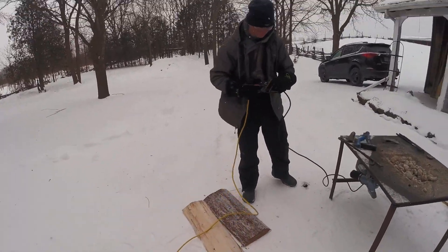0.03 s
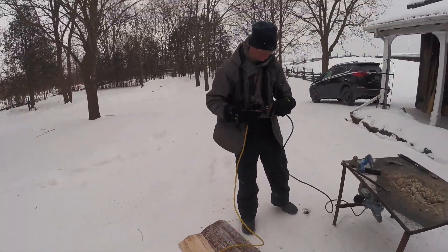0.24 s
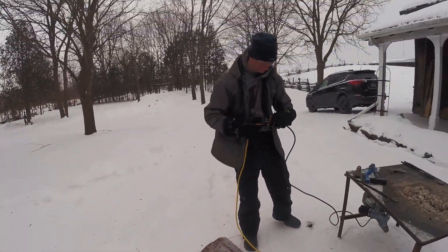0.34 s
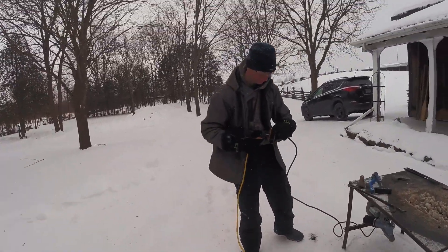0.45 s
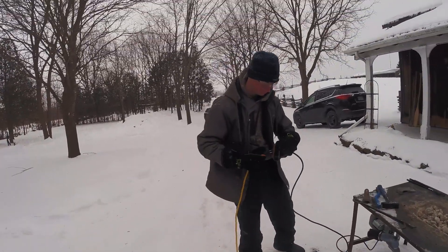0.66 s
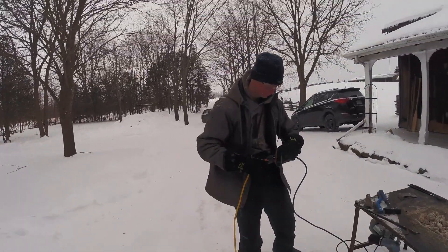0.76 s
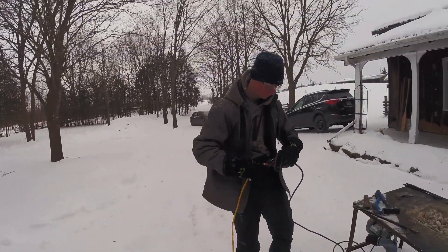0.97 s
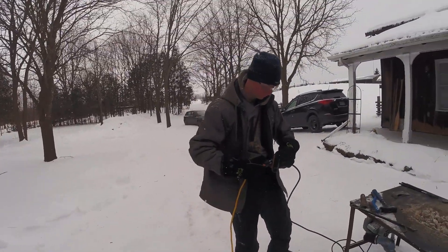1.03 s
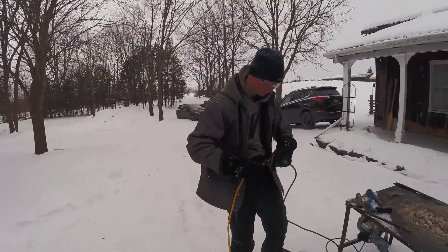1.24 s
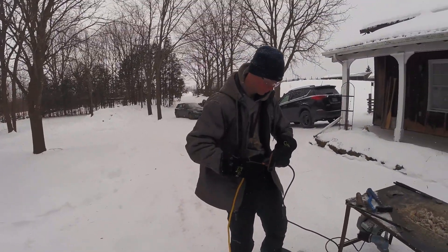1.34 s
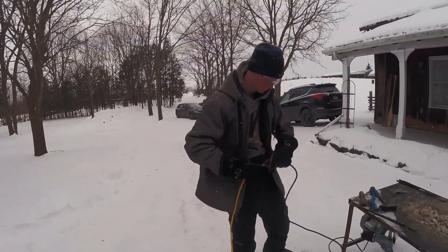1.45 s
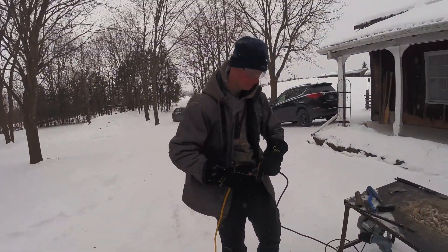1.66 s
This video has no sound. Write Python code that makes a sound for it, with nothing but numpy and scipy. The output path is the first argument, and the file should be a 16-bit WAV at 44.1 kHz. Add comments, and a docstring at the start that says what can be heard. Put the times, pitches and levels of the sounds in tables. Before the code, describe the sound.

Boots crunch in crusty snow, two slow steps with small snaps and brief squeaks, close to a hand-held microphone in an open yard. Wind rumbles throughout. Faint taps and a brief low ring precede one last short crunch.

```python
"""A faint tap over a quiet outdoor hush, then two slow steps in cold snow, close to a hand-held
microphone in an open yard. Under each boot the crust snaps here and there, then packs down in a
dense crunch of breaking grains, with a brief squeak now and then. Loose crumbs tick between the
steps and wind buffets the microphone. Near the end come more faint taps and a brief low ring
from nearby, and a last short crunch with a thudding snap."""
import sys
import numpy as np
from scipy import signal
from scipy.fft import rfft, irfft, next_fast_len
from scipy.io import wavfile
from scipy.ndimage import uniform_filter1d

SR = 44100
rng = np.random.default_rng(int(sys.argv[2]) if len(sys.argv) > 2 else 0)


def bounce(signal):
    """Save signal as a 16-bit WAV file at the path given by the first command-line argument."""
    frames = np.transpose(np.atleast_2d(signal))
    limited = np.clip(frames, -1, 1)
    pcm = np.round(limited * 32767).astype(np.int16)
    wavfile.write(sys.argv[1], SR, pcm)


N = 74970


def undb(db):
    """Decibels to gain."""
    return 10 ** (np.asarray(db) / 20)


def unit(x):
    """Scale to rms 1."""
    return x / np.sqrt(np.mean(x ** 2) + 1e-20)


def colour(x, points):
    """Causal, minimum-phase filter through (Hz, dB) points."""
    size = 2 * next_fast_len(N)
    hz, db = np.array(points).T
    bin_hz = np.arange(size // 2 + 1) * SR / size
    log_gain = np.log(undb(np.interp(np.log(bin_hz + 1), np.log(hz), db)))
    cepstrum = irfft(log_gain)
    cepstrum[1:size // 2] *= 2
    cepstrum[size // 2 + 1:] = 0
    return irfft(rfft(x, size) * np.exp(rfft(cepstrum)))[:N]


def curve(rows, column):
    """Gain over time from one dB column; silent outside the rows."""
    rows = np.array(rows)
    return undb(np.interp(np.arange(N) / SR, rows[:, 0], rows[:, column], left=-120, right=-120))


def even(x, window_s=.031):
    """Hold the short-term rms near 1 while keeping the fine grain."""
    size = int(window_s * SR)
    power = uniform_filter1d(uniform_filter1d(x ** 2, size), size // 2)
    return x / np.sqrt(power + 1e-20)


def grains(per_s, spread_db):
    """Random fractures, many small and a few large."""
    chance, size, sign = rng.random(N), rng.exponential(size=N), rng.choice([-1, 1], N)
    return (chance < per_s / SR) * sign * undb(spread_db * np.minimum(size, 5))


def cracks(rows, bands, count=2048, softness_hz=1500, level_window_s=.008):
    """Each crack is a sharp break and a short crumbling, softened and levelled in three bands."""
    out, t = np.zeros(N + count), np.arange(count) / SR
    filters = [signal.butter(3, band, "bp", fs=SR, output="sos") for band in bands]
    for start, decay, *levels in rows:
        burst = .45 * rng.standard_normal(count) * np.exp(-t / decay)  # the crumbling
        burst[0] += 1  # the break
        burst = signal.lfilter(*signal.butter(1, softness_hz, fs=SR), burst)
        i = int(start * SR)
        for k, (sos, db) in enumerate(zip(filters, levels)):
            part = signal.sosfilt(sos, burst)
            gain = undb(db) * np.sqrt(level_window_s * SR / np.sum(part ** 2))
            out[i:i + count] += (-1) ** k * gain * part
    return out[:N]


def hush():
    """The steady, mostly low background of the open yard."""
    # Each row: frequency in Hz, relative level in dB.
    hush_colour = [(20, -3.5), (100, -2), (300, -7), (600, -18), (1200, -26.5), (2500, -24.5),
                   (5000, -30.5), (10000, -39), (15500, -46)]
    return undb(-54.5) * unit(colour(rng.standard_normal(N), hush_colour))


def crumbs():
    """Loose crumbs of snow tick softly around the steps."""
    # Tone of the ticks. Each row: frequency in Hz, relative level in dB.
    crumb_colour = [(100, -25), (350, -2), (600, 0), (1200, -6), (2500, -15), (5000, -24), (10000, -38),
                    (15000, -52)]
    # Their rise and fall. Each row: time in seconds, relative level in dB.
    crumb_levels = [(0, 4.5), (.2, 5), (.7, 2), (.8, -4.5), (1.2, -1), (1.5, 1), (1.7, -6)]
    ticks = unit(colour(grains(per_s=330, spread_db=2), crumb_colour))
    return undb(-61.5) * ticks * curve(crumb_levels, column=1)


def taps(treble_octaves=1.15):
    """Small hard taps nearby, each with its own bright resonance."""
    # Each row: start and decay in seconds, low, mid and treble levels in dB, treble centre in Hz.
    strikes = [(0.015, 0.0021, -54.5, -61, -62, 4940), (.127, 0.0017, -50, -53.5, -55, 6560),
               (1.233, 0.0015, -68, -69, -62.5, 10000), (1.438, 0.0026, -51, -54, -62.5, 8500),
               (1.4584, 0.0016, -51, -49, -45, 3140), (1.604, 0.0016, -59, -67, -64, 11000)]
    # The low and mid bands. Each row: lower and upper edge in Hz.
    bands = [(350, 1000), (950, 3600)]
    edge_ratios = 2 ** (np.array([-1, 1]) * treble_octaves / 2)
    return sum(cracks([row], bands + [hz * edge_ratios]) for *row, hz in strikes)


def yard(x, t, t60_s=.12):
    """The close sound plus a faint short scatter from the snowy yard."""
    tail = rng.standard_normal(N) * np.exp(-np.log(1000) * t / t60_s)
    return x + undb(-19) * signal.fftconvolve(x, tail / np.sqrt(np.sum(tail ** 2)))[:N]


def snaps():
    """The crust snaps under the boot, close to the microphone."""
    # Each row: start and crumble time in seconds, relative low, mid and treble levels in dB.
    breaks = [(.056, 0.00033, -45, -52, -61), (.071, 0.001, -54.5, -75, -77),
              (.0945, 0.00085, -53, -62, -74), (.144, 0.0025, -35.5, -57, -63),
              (.154, 0.004, -41, -55, -52.5), (.22, 0.00093, -37.5, -43, -67),
              (.2725, 0.0017, -34, -45, -55), (.297, 0.00065, -53, -65, -72),
              (.3225, 0.0009, -49, -50.5, -60), (.333, 0.00053, -39.5, -49, -73),
              (.336, 0.0011, -40.5, -59, -68), (.368, 0.0017, -40.5, -45, -66),
              (.3935, 0.0022, -41, -49, -54.5), (.425, 0.00065, -42, -43, -58),
              (.4395, 0.0011, -41, -47, -53), (.4585, 0.00084, -50, -43, -56),
              (.476, .001, -43.5, -47.5, -58), (.4995, 0.00073, -48, -43, -54),
              (.5265, 0.00064, -45, -44, -52), (.547, .003, -35, -45, -48), (.5735, 0.0019, -44, -47, -54),
              (.6095, 0.0019, -32.5, -46.5, -54.5), (.615, .0015, -36, -53, -62),
              (.6495, 0.00097, -39.5, -52.5, -62), (.8595, 0.001, -40.5, -56.5, -64),
              (.9335, 0.0034, -38.5, -46, -53), (.945, 0.0012, -40.5, -48, -57),
              (.9945, 0.00093, -45.5, -56, -66), (1.016, 0.0027, -36, -47, -49.5),
              (1.0225, 0.0028, -36, -56, -60), (1.0305, 0.0021, -43.5, -47, -57),
              (1.041, .0008, -43, -56, -73), (1.057, .0015, -38, -46, -53), (1.0705, 0.0005, -49, -49, -54),
              (1.0855, 0.0037, -36, -43.5, -53.5), (1.104, 0.0054, -36, -47, -65),
              (1.111, 0.0023, -37.5, -44, -56), (1.129, .001, -43, -56, -63),
              (1.1465, 0.0016, -39.5, -52, -61), (1.157, 0.00091, -50, -57, -59),
              (1.2065, 0.0014, -39.5, -48.5, -62.5), (1.283, .002, -51, -60, -65),
              (1.393, 0.0015, -53, -59.5, -77), (1.678, 0.0022, -38, -44, -57.5)]
    # The low, mid and treble bands. Each row: lower and upper edge in Hz.
    bands = [(330, 955), (1050, 2490), (2700, 8300)]
    return undb(-1) * cracks(breaks, bands)


def wind():
    """Gusts pass over the microphone as a slow rumble and a quicker flutter."""
    # Each row: time in seconds, relative levels of rumble and flutter in dB.
    gusts = [(0, -78, -68), (.185, -57, -61), (.215, -27.5, -57), (.28, -27, -37), (.37, -23.5, -33.5),
             (.45, -37, -45.5), (.535, -27.5, -41.5), (.6, -35.5, -51), (.69, -31, -59),
             (.745, -33.5, -37.5), (.785, -35, -50), (.85, -39, -26), (.92, -30, -31.5), (.985, -36, -40),
             (1.03, -27.5, -25), (1.11, -29, -33.5), (1.18, -55, -31), (1.23, -48, -46.5),
             (1.3, -28.5, -33), (1.4, -34.5, -55), (1.48, -29.5, -48), (1.55, -44, -70),
             (1.61, -39.5, -50.5), (1.66, -64, -61), (1.7, -74, -64)]
    # Tone of the rumble and of the flutter. Each row: frequency in Hz, relative level in dB.
    rumble_colour = [(12, -12.5), (25, -3), (45, 7.5), (70, -0.5), (100, -7), (160, -16), (400, -78)]
    flutter_colour = [(40, -19), (85, 4), (125, -3.5), (200, -8.5), (300, -17.5), (450, -30.5), (900, -69),
                      (3000, -95.5)]
    rumble = undb(-8) * even(colour(rng.standard_normal(N), rumble_colour)) * curve(gusts, column=1)
    flutter = undb(1) * even(colour(rng.standard_normal(N), flutter_colour)) * curve(gusts, column=2)
    return rumble + flutter


def jerks(share, per_s=160, spread_db=1.2, decay_s=.0012):
    """Snow gives way unevenly: a gain of rms 1 with that share of its power in little jerks."""
    gaps, sizes = rng.random((N // 50, 2)).T
    onsets = (np.cumsum(.5 + gaps) * SR / per_s).astype(int)
    energies = undb(spread_db * -np.log(1 - sizes)) ** 2
    kicks = np.bincount(onsets, energies, minlength=N)[:N]
    power = signal.lfilter([1], [1, -np.exp(-1 / (decay_s * SR))], kicks)
    return np.sqrt(1 - share + share * power / power.mean())


def crunch():
    """Clumps and fine crystals break as the weight comes onto each boot."""
    # One list per crunch. Each row: time in seconds, relative levels of clumps and crystals in dB.
    steps = [
        [(.31, -65, -72), (.385, -56, -67.5), (.42, -45.5, -62.5), (.47, -46, -53.5), (.52, -40.5, -52.5),
         (.572, -44, -53), (.598, -50, -64), (.635, -54, -66.5), (.73, -70, -71.5)],
        [(.885, -74, -89), (.908, -52, -56.5), (.94, -65, -60.5), (.985, -56, -60.5), (1.008, -63, -64),
         (1.025, -53, -53.5), (1.07, -46, -65.5), (1.115, -43, -57.5), (1.145, -51.5, -59.5),
         (1.165, -53.5, -69), (1.205, -62.5, -60.5), (1.235, -78, -82)],
        [(1.555, -70, -91), (1.605, -59, -64), (1.64, -58.5, -69.5), (1.67, -49, -62.5), (1.7, -54, -66)],
    ]
    # Tone of the clumps and of the crystals. Each row: frequency in Hz, relative level in dB.
    clump_colour = [(60, -43.5), (150, -5.5), (330, 3.5), (500, -3), (750, -6), (1200, -8.5), (2200, -17),
                    (3200, -46), (6000, -49), (15000, -72)]
    crystal_colour = [(300, -37), (1500, -8.5), (2800, 0.5), (4200, -3.5), (6500, -12.5), (9000, -15),
                      (12000, -24.5), (15500, -27)]
    yielding = jerks(share=.65)
    gentler = yielding ** (.3 / .65)  # the crystals follow the jerks less
    clumps = undb(6) * even(colour(yielding * grains(per_s=3000, spread_db=2), clump_colour))
    crystals = undb(5) * even(colour(gentler * grains(per_s=9000, spread_db=2.5), crystal_colour))
    return sum(clumps * curve(step, column=1) + crystals * curve(step, column=2) for step in steps)


def thumps(t):
    """Low thumps: the strongest wind eddies and, at 1.683 s, the thud of the last snow snap."""
    # A push, then a pull of air. Each row: centre and half length in seconds, peak in dB.
    pulses = [(.315, 0.0018, -21.5), (0.367, 0.0028, -22.5), (.395, 0.0024, -17.5), (0.541, 0.0013, -34),
              (0.744, 0.0027, -31), (0.808, 0.0016, -21), (.838, 0.0028, -17), (.862, 0.013, -34),
              (.881, 0.0023, -18.5), (.917, 0.0011, -20.5), (1.027, 0.0012, -18), (1.077, 0.0033, -28),
              (1.106, 0.0019, -17), (1.146, 0.0041, -20.5), (1.168, 0.0049, -23), (1.207, 0.0035, -26.5),
              (1.259, 0.0016, -18.5), (1.384, 0.0027, -28), (1.442, 0.0017, -30), (1.683, 0.00062, -27.5)]
    out = np.zeros(N)
    for centre, half, db in pulses:
        offset = (t - centre) / half
        out -= undb(db) * offset * np.exp(.5 - .5 * offset ** 2)
    return out


def squeaks(t, wobble_rad=.6, wobble_hz=150):
    """Packed snow squeaks: a few uneven cycles of stick and slip under the sole."""
    # Each row: centre and width in seconds, pitch in Hz, peak in dB.
    slips = [(0.878, 0.0032, 426, -32.5), (0.912, 0.0028, 367, -29.5), (1.657, 0.0076, 777, -42)]
    lowpass = signal.butter(2, wobble_hz, fs=SR, output="sos")
    wobble = wobble_rad * unit(signal.sosfilt(lowpass, rng.standard_normal(N)))
    out = np.zeros(N)
    for centre, width, hz, db in slips:
        envelope = undb(db) * np.exp(-.5 * ((t - centre) / width) ** 2)
        out += envelope * np.sin(2 * np.pi * hz * (t - centre) + wobble)
    return out


def ring(t, hz=241, start_s=1.445, stop_s=1.61, attack_s=.02, t60_s=2.3, release_s=.016):
    """One low mode nearby that rings on after a tap and is then damped."""
    age = np.maximum(t - start_s, 0)
    attack = 1 - np.exp(-age / attack_s)
    decay = np.exp(-np.log(1000) * age / t60_s)
    damping = np.exp(-np.maximum(t - stop_s, 0) / release_s)
    return undb(-47.5) * attack * decay * damping * np.sin(2 * np.pi * hz * age)


def scene():
    """Close steps, nearby taps and a ring in the yard, with wind, thumps and hush, in mono."""
    t = np.arange(N) / SR
    steps = crunch() + crumbs() + squeaks(t) + snaps()
    background = hush()
    return (yard(steps + taps(), t) + ring(t) + wind() + thumps(t) + background)[None]


def record(dry):
    """The recorder cuts the top steeply above 15.6 kHz."""
    return signal.sosfilt(signal.ellip(10, .2, 70, 15600, fs=SR, output="sos"), dry)


dry = scene()
out = record(dry)
bounce(out)
```